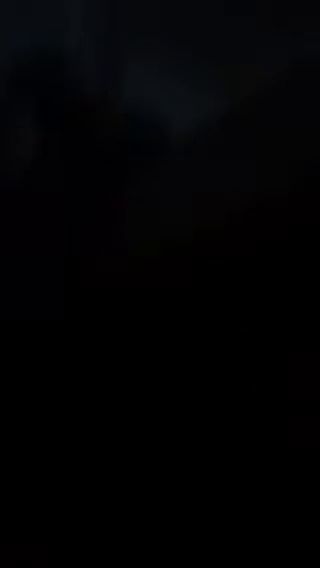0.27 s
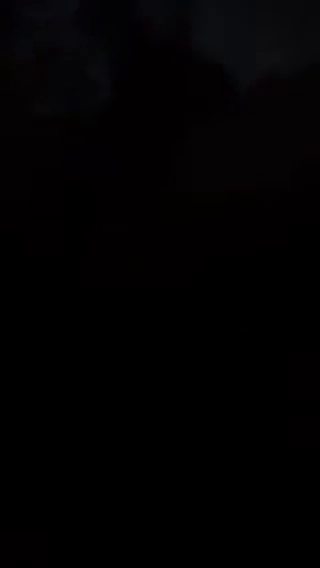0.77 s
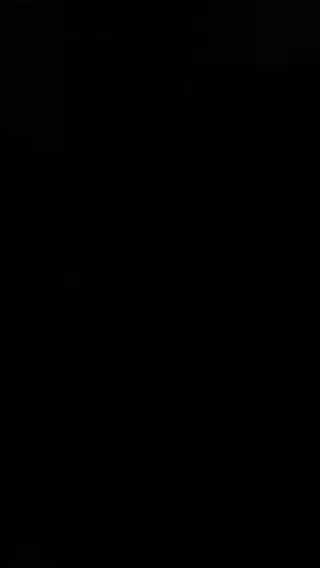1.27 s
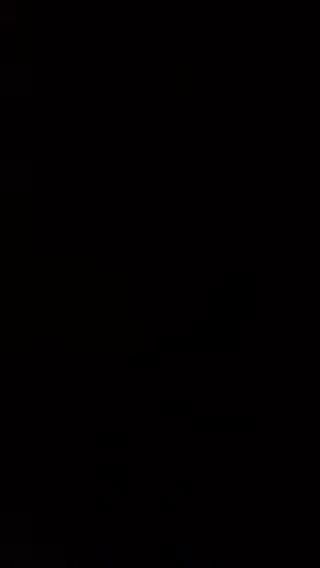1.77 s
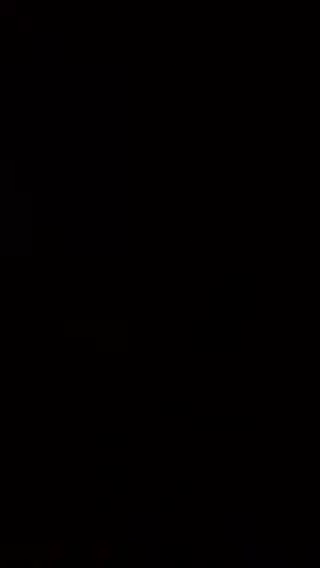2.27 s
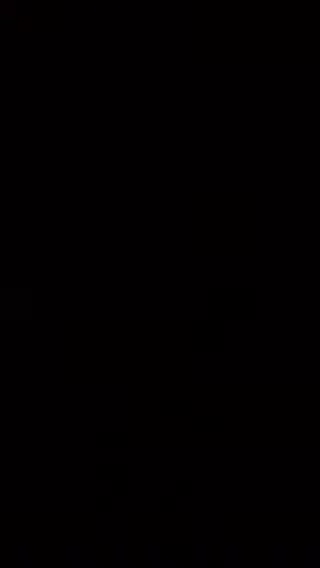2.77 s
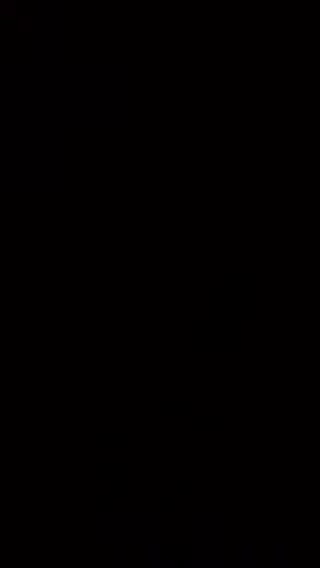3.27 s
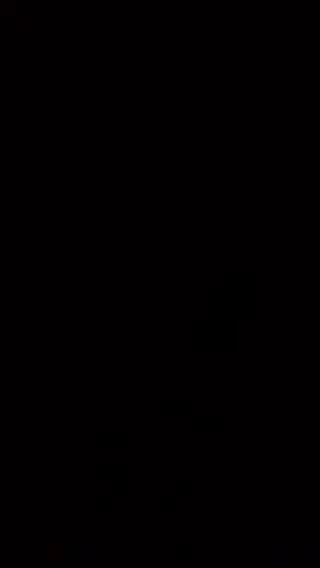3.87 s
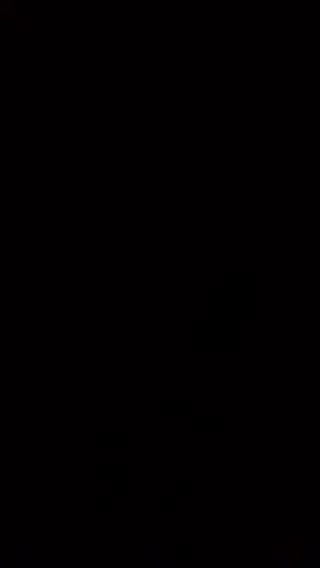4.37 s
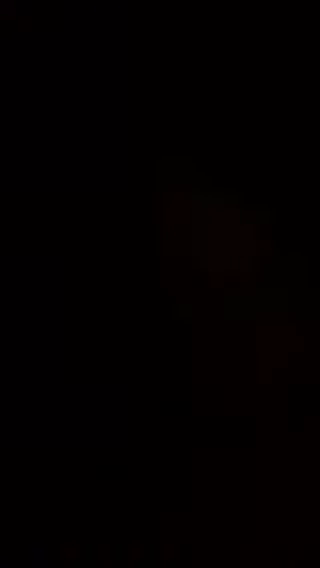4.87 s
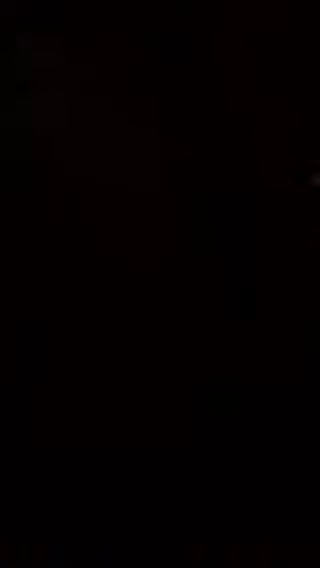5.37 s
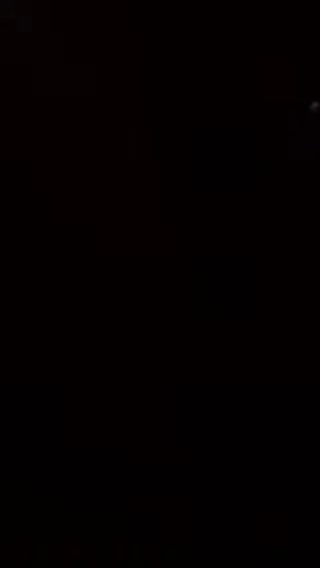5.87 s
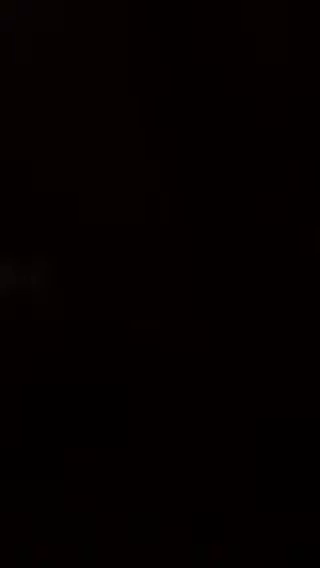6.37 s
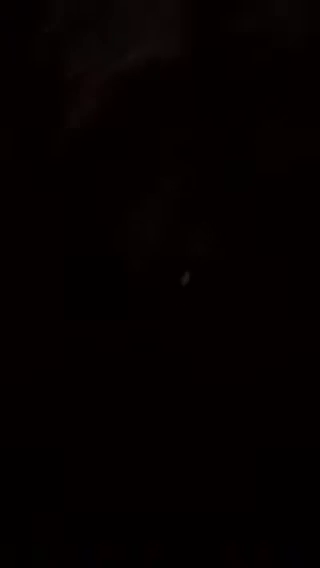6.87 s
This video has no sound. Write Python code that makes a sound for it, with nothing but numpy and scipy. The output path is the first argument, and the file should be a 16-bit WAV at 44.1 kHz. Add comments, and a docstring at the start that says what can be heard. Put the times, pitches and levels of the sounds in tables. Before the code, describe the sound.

Close up in a small quiet room, a small dog shuffles on soft bedding. A claw clicks and rasps at once, then a scrape at 0.35 s and light padded steps up to 0.9 s. A tight burst of snags and a scratch comes around 1.1 s, single clicks near 1.5 s. At 1.9-2.1 s paws and body land in a rolling cluster of deep, dull thumps. Clicks and softer steps continue, with small scrapes around 3 s. At 3.6 s a hard step thuds and knocks hollowly on the base beneath. From 4.2 to 5.5 s claws scratch more brightly, with a breathy fur swish near 5.4 s. Sparser clicks follow, a soft thump at 6.26 s, and a last click and step at 7.1 s. Bedding crinkles throughout; a faint wavering low hum and rumble grow stronger after 4.5 s and ease near 6.7 s.

```python
"""A claw snags with a sharp click and rasps over cloth: a puppy shuffles on soft bedding, close to the microphone.
The place is a small quiet room. Claws are bursts of tiny slips ringing through cloth resonances; paws and body
land as sagging low tones with a dull puff, and a hard step knocks on the firm base under the padding.
Fur swishes and creasing bedding are shaped noise and patches of small snaps.
Underneath lie a faint wavering mains hum, a low rumble and the noise of the room."""
import sys
import numpy as np
from scipy import signal
from scipy.fft import rfft, irfft, next_fast_len
from scipy.io import wavfile

SR = 44100
rng = np.random.default_rng(int(sys.argv[2]) if len(sys.argv) > 2 else 0)


def materialize(psi):
    """Save the field psi as 16-bit PCM at rate SR to the path in sys.argv[1].

    A 1-D psi becomes a single channel; in a 2-D psi each row is a channel.
    """
    bounded = np.clip(np.atleast_2d(psi).T, -1, 1)
    quanta = np.round(bounded * 32767).astype(np.int16)
    wavfile.write(sys.argv[1], SR, quanta)


N = 314124
TIME = np.arange(N) / SR  # seconds

# Event levels below are those before the trims of each layer.
# claws dragged over cloth: start_s, length_s, level_db (0.9-5 kHz), resonance_hz, treble_db (against the level)
CLAW_SCRAPES = [(0.026, 0.033, -43.5, 1360, -7), (0.348, 0.047, -34.5, 2180, -13.5),
                (0.825, 0.023, -42.5, 1370, -28), (0.86, 0.037, -48.5, 1400, -17),
                (1.067, 0.089, -38, 1880, -6), (1.255, 0.028, -42, 1790, -16),
                (1.634, 0.032, -46, 2530, -5.5), (1.836, 0.11, -40, 1940, -7.5),
                (2.067, 0.035, -46, 2600, -8.5), (2.413, 0.056, -48.5, 1520, -6.5),
                (2.597, 0.045, -46, 1800, -7), (2.938, 0.058, -43, 1680, -13),
                (3.006, 0.048, -39, 1640, -3), (3.098, 0.058, -50, 2460, 2.5),
                (3.157, 0.052, -47.5, 2650, -7), (3.34, 0.049, -44.5, 1290, -10),
                (3.642, 0.07, -44, 1440, -8), (3.705, 0.091, -46.5, 2100, -8),
                (4.197, 0.04, -37.5, 2880, -8.5), (4.48, 0.14, -39, 3140, -6),
                (4.742, 0.041, -46.5, 2240, -8.5), (4.81, 0.042, -33, 3520, -2.5),
                (5.079, 0.11, -38, 1450, -10), (5.169, 0.032, -47, 3050, -4),
                (5.255, 0.028, -48, 3020, 0.5), (5.39, 0.099, -47.5, 3170, -9),
                (5.482, 0.038, -34.5, 2500, -4.5), (5.828, 0.041, -39.5, 1560, -8.5),
                (6.157, 0.029, -48, 1460, -6), (6.29, 0.033, -46.5, 3300, -12),
                (6.864, 0.027, -48, 3830, 0.5)]
# claws snagging a thread: start_s, level_db (0.9-5 kHz), resonance_hz, treble_db (against the level)
CLAW_SNAGS = [(0.006, -32, 2340, -3.5), (0.63, -45.5, 1710, -9), (0.7131, -32.5, 4130, 0),
              (0.8444, -37, 1580, -8), (0.927, -48, 1740, -17), (1.059, -31, 2300, -23),
              (1.065, -32, 3260, -27), (1.0904, -29, 1730, -1), (1.108, -39, 5000, 0),
              (1.4723, -31.5, 1370, -11.5), (1.478, -36.5, 3570, -2.5), (1.7267, -39.5, 3520, -8.5),
              (1.751, -42, 1870, -12), (1.8405, -28.5, 1540, -24), (1.8817, -44, 2400, 10),
              (1.915, -42, 1950, 2), (1.9462, -48.5, 2370, 18.5), (2.2572, -33.5, 3350, 1.5),
              (2.309, -32.5, 1500, -20), (2.5803, -42, 4170, -6), (2.6876, -32, 2160, -18.5),
              (3.1763, -38.5, 2650, -4), (3.434, -29, 4100, -9.5), (3.6408, -34.5, 2140, -12.5),
              (4.1151, -34, 4480, -9), (4.2032, -38, 2630, -7), (4.4803, -37, 1940, -43),
              (4.554, -33.5, 3930, -4), (4.591, -39.5, 4350, 4), (4.8145, -31, 3280, -10),
              (4.959, -35, 1790, -12), (5.1782, -28.5, 3080, -16), (5.4833, -30, 2540, -13),
              (5.4915, -51, 2410, -8), (5.6223, -47.5, 2320, -7), (5.7304, -45, 2440, -11),
              (5.8293, -39.5, 2380, -15), (5.938, -36, 2480, -4.5), (6.262, -37.5, 1870, -13),
              (6.34, -38, 4320, -10.5), (6.654, -41, 4000, -3), (7.110, -33.5, 1540, -10)]
# paws and body landing on the padding: start_s, peak_db, pitch_hz
THUMPS = [(0.213, -40, 120), (0.471, -35.5, 164), (.675, -47, 199), (0.832, -36.5, 196), (0.903, -34, 75.6),
          (.91, -41, 293), (1.063, -38.5, 197), (1.897, -34.5, 148), (1.915, -31, 52.7),
          (1.941, -27.5, 120), (1.964, -24.5, 212), (2.009, -31, 89.5), (2.039, -32, 192),
          (2.08, -34.5, 91), (2.633, -34, 175), (2.679, -38.5, 151), (2.762, -39.5, 214),
          (2.826, -37.5, 96), (3.351, -42, 68), (3.497, -38.5, 106), (3.595, -23.5, 251), (3.612, -26, 216),
          (3.644, -25.5, 227), (3.643, -35, 64.6), (3.681, -33.5, 166), (4.249, -42.5, 170),
          (4.471, -40, 187), (4.53, -37, 200), (5.121, -45, 60), (5.564, -37, 174.6), (6.026, -37.5, 175),
          (6.263, -31, 166), (6.385, -38.5, 69), (6.466, -38, 246), (7.109, -36.5, 238)]
# hollow knocks from the firm base under the padding: start_s, peak_db, pitch_hz
BASE_KNOCKS = [(.349, -39, 600), (2.307, -46, 650), (3.345, -43, 644), (3.597, -30, 589), (3.598, -30, 342),
               (3.597, -31.5, 1155), (3.65, -32.5, 1182), (4.535, -42.5, 654), (5.384, -45, 438),
               (6.26, -43.5, 583), (6.468, -45.5, 348), (7.109, -41.5, 605)]
# fur sliding over cloth: start_s, rise_s, length_s, level_db
FUR_SWISHES = [(0.218, 0.23, 0.34, -54.5), (1.568, 0.011, 0.059, -49), (3.34, 0.033, 0.036, -48),
               (4.855, 0.018, 0.048, -43), (5.324, 0.018, 0.16, -45.5), (5.362, 0.042, 0.094, -35),
               (6.447, 0.031, 0.049, -44.5)]
# the dog shifts its weight and the bedding creases: start_s, length_s, crinkle_level_db, fur_hiss_level_db
WEIGHT_SHIFTS = [(0.179, 0.42, -49.5, -62), (0.75, 0.26, -53, -74), (1.187, 0.23, -52, -56),
                 (1.544, 0.16, -48, -64), (1.93, 0.14, -72, -65), (2.149, 0.43, -53, -64.5),
                 (2.596, 0.27, -51.5, -63), (3.27, 0.4, -50, -59.5), (3.75, 0.2, -56, -74),
                 (4.02, 0.24, -54, -71), (4.235, 0.33, -51, -72), (4.83, 0.26, -49.5, -52),
                 (5.555, 0.18, -65, -88), (5.84, 0.26, -63, -63.5), (6.07, 0.54, -56, -65),
                 (6.55, 0.39, -78, -67), (7.009, 0.063, -60, -69.5)]
# hum and the low rumble that swells with it: time_s, level_db
HUM_LEVEL = [(0, -56), (2.6, -56), (4.05, -61), (4.6, -49.5), (5.5, -52.5), (6.5, -47.5), (6.75, -56.5)]

# Spectra, each with columns frequency_hz, density_db (per Hz, relative).
# stretched cloth under a claw, before its resonances
CLOTH_SPECTRUM = [(100, -18), (300, -10), (600, -11.5), (850, -8.5), (1080, -3.5), (1300, -0.5),
                  (2200, 2.5), (3500, -1), (6000, -10), (9000, -18), (12000, -22), (15500, -31.5)]
# puff pressed out of the padding
PADDING_SPECTRUM = [(20, 0), (50, -3), (130, 4), (250, -0.5), (380, -11.5), (620, -18), (800, -19),
                    (1150, -16.5), (2000, -24), (6000, -40)]
# hairs in a swish
FUR_SPECTRUM = [(200, 0), (450, -9), (850, -19), (1700, 2), (4000, 1), (7000, 3.5), (11000, 5.5),
                (15500, 4)]
# slow brushing of fur during a shift of weight
NAP_SPECTRUM = [(300, -24), (1000, -2), (2000, -12), (5000, 8), (7500, 6), (11000, 0.5), (15500, -0.5)]
# low rumble under the hum
RUMBLE_SPECTRUM = [(20, -40), (40, -14), (58, 9), (85, 5.5), (130, 2.5), (200, 3), (300, -27.5), (500, -43),
                   (1500, -24)]
# noise of the room
AIR_SPECTRUM = [(20, -23), (35, -2), (55, -10.5), (80, -2.5), (130, 0), (220, -4), (330, -12), (500, -12),
                (1000, -15.5), (2200, -23.5), (5000, -25.5), (10000, -35), (15500, -36)]
# decay of the room: frequency_hz, t60_s
ROOM_DECAY = [(100, 0.79), (500, 0.4), (2000, 0.22), (6000, 0.19), (14000, 0.14)]

HUM_HZ = 118
EDGE_HZ = 15600  # upper limit of the band
RISE_SHARE = 0.39  # part of a drag spent building up pressure
RING_DB, BLUR_DB_PER_S = 9.5, 42  # height of the resonance; a longer drag crosses more spots and blurs it
SLIDE_S, SLIDE_RISE_S, SLIDE_DB = 0.016, 0.001, -9  # short slide after every snag, against the snag's level
SWELL_S, SWELL_HZ, SWELL_SLOPE = 0.0083, 178, 0.38  # swell time at this pitch; deeper thumps swell more slowly
KNOCK_CYCLES = 3.1  # the envelope of a knock peaks after this many cycles
SHIFT_TAPER = 0.34  # part of a shift spent swelling and fading
CREASE_DB, SETTLE_DB_PER_S = -13, 89  # creasing against the drag's level; the creases then settle
SNAG_CREASE_DB, CREASE_HISS_DB = -15, -19.5  # creasing against the snag's level; fur hiss against crinkle


def scrapes(level_db=-2.0, dull_db=-5, bright_db=0.0, clump_db=1.5, stutter_db=2.0):
    """A claw catches abruptly, then rasps over the weave in clumps of tiny slips, brightening as it speeds up."""
    grip = amp(clump_db * drift(300) + stutter_db * drift(80))
    slips = np.tile(grains(per_s=4200, spread_db=1.5) * grip, 2)
    out = np.zeros(N + SR)
    for start_s, rise_s, length_s, db, hz, treble_db in drags():
        height_db = RING_DB - BLUR_DB_PER_S * length_s
        press = stroke(rise_s, length_s, start=0.51, end=0.33)
        own_slips = slips[max(int(start_s * SR), 0):][:len(press)]
        run = amp(db + level_db) * evened(press * own_slips)
        speed = np.minimum(np.arange(len(run)) / SR / max(rise_s, .001), 1)
        # crossfade from a dull ring to a bright one
        for share, extra_db in (1 - speed, dull_db), (speed, bright_db):
            ring = cloth(hz, treble_db + extra_db, peak_db=height_db, octaves=0.17, uneven_db=3.25)
            add(out, start_s, signal.fftconvolve(run * share, ring))
    return out[:N]


def drags():
    """Every drag, and the slide after every snag: start_s, rise_s, length_s, level_db, resonance_hz, treble_db."""
    full = [(start_s, RISE_SHARE * length_s, length_s, db, hz, treble_db)
            for start_s, length_s, db, hz, treble_db in CLAW_SCRAPES]
    slides = [(start_s, SLIDE_RISE_S, SLIDE_S, db + SLIDE_DB, hz, treble_db)
              for start_s, db, hz, treble_db in CLAW_SNAGS]
    return full + slides


def clicks(level_db=-1.0, crackle=1.75, fade_s=0.0033, count=600):
    """A thread snaps off the claw, and a few milliseconds of smaller slips follow."""
    out, t = np.zeros(N), np.arange(count) / SR
    slips = grains(per_s=5700, spread_db=3.0)
    for k, (start_s, db, hz, treble_db) in enumerate(CLAW_SNAGS):
        after = slips[k * count:][:count] * np.exp(-t / fade_s)
        snap = crackle * after / (np.linalg.norm(after) + 1e-9) + (t == 0)
        snap *= np.sqrt(.004 * SR) / np.linalg.norm(snap)  # the energy of 4 ms at rms 1
        ring = cloth(hz, treble_db, peak_db=7.0, octaves=0.12, uneven_db=1.5)
        add(out, start_s, amp(db + level_db) * signal.fftconvolve(snap, ring))
    return out[:N]


def cloth(hz, treble_db, peak_db, octaves, uneven_db, size=2048):
    """Ring of one spot of stretched cloth: a main resonance, uneven lesser ones and a treble shelf."""
    f = np.fft.rfftfreq(size, 1 / SR)
    body, top = (f > 900) & (f < 5000), (f > 5000) & (f < EDGE_HZ)
    knots = np.linspace(np.log(200), np.log(SR / 2), 60)
    lesser = np.interp(np.log(f + 1), knots, rng.standard_normal(60))
    resonance_db = peak_db / (1 + (np.log2((f + 1) / hz) / octaves) ** 2)
    db = read(CLOTH_SPECTRUM, f) + resonance_db + uneven_db * lesser
    top_to_body = np.sum(amp(db[top]) ** 2) / np.sum(amp(db[body]) ** 2)
    lack_db = treble_db - 10 * np.log10(top_to_body)
    db = db + lack_db * np.interp(f, [3300, 5800], [0, 1])
    # the level counts in the body band only
    log_gain = np.log(amp(db) / np.sqrt(2 * np.sum(amp(db[body]) ** 2) / size))
    circle = np.concatenate([log_gain, log_gain[-2:0:-1]])
    # minimum phase: causal, with a sharp start and a short ring
    return np.fft.ifft(np.exp(np.conj(signal.hilbert(circle)))).real


def grains(per_s, spread_db):
    """Fibres letting go at random: many small impulses and a few large ones."""
    size = amp(spread_db * np.minimum(rng.exponential(1, N), 4))
    return size * rng.choice([-1, 1], N) * (rng.random(N) < per_s / SR)


def stroke(rise_s, length_s, start, end):
    """Pressure of a stroke: from a share start up to full, then down to a share end, evened to rms 1."""
    t = np.arange(int(max(length_s, .005) * SR)) / SR
    peak_s = np.clip(rise_s, .001, t[-1] - .001)
    return evened(np.exp(np.interp(t, [0, peak_s, t[-1]], np.log([start, 1, end]))))


def thumps(push_db=-1, puff_db=-10.5, sag=0.067, wobble=0.095):
    """Each landing rocks the padding for a few uneven cycles and presses a dull puff out of it."""
    out, weight, t = np.zeros(N), np.zeros(N), np.arange(SR // 4) / SR
    stiffness = np.tile(np.exp(wobble * drift(180)), 2)  # the stuffing gives way in fits
    for start_s, db, hz in THUMPS:
        u = t / (SWELL_S * (SWELL_HZ / hz) ** SWELL_SLOPE)  # time in swell times
        push = amp(db) * u * np.exp(1 - u)
        sagging = 1 + sag * (np.exp(1 - u) - 1)  # the pitch sags as the padding relaxes
        pitch_hz = hz * sagging * stiffness[int(start_s * SR):][:len(t)]
        add(out, start_s, push * np.sin(2 * np.pi * np.cumsum(pitch_hz) / SR))
        add(weight, start_s, push)
    puff = weight * shaped(rng.standard_normal(N), PADDING_SPECTRUM)
    return amp(push_db) * out + amp(puff_db) * puff


def knocks(level_db=0, spread=0.205):
    """A hard step reaches the base, which answers with five close, heavily damped modes."""
    out, t = np.zeros(N), np.arange(SR // 8) / SR
    ratios = np.linspace(-1, 1, 5)[:, None]
    for start_s, db, hz in BASE_KNOCKS:
        swell_s = KNOCK_CYCLES / hz
        mode_hz = hz * (1 + spread * ratios * rng.uniform(0.67, 1, (5, 1)))
        modes = np.sin(2 * np.pi * (mode_hz * t + rng.random((5, 1)))).mean(0)
        envelope = t / swell_s * np.exp(1 - t / swell_s)
        add(out, start_s, amp(db + level_db) * evened(modes) * envelope / 2)
    return out


def swishes():
    """Thousands of hairs slide over the cloth: a smooth bright hiss, made of shaped noise."""
    level = np.zeros(N)
    for start_s, rise_s, length_s, db in FUR_SWISHES:
        press = stroke(rise_s, length_s, start=0.25, end=0.067)
        add(level, start_s, amp(db) * press * signal.windows.tukey(len(press), .15))
    return level * shaped(rng.standard_normal(N), FUR_SPECTRUM)


def rustle(heavy_db=-9, crinkle_db=-2.5, hiss_db=0, flutter_db=2.76, count=12):
    """Small patches of bedding, each with its own colour, crease under claws and shifting weight; fur brushes."""
    crinkle, hiss = stirring()
    fine = evened(grains(per_s=3000, spread_db=3.0))
    heavy = evened(grains(per_s=78, spread_db=3.0))
    snaps = fine + amp(heavy_db) * heavy  # sparser, heavier snaps crackle among the fine ones
    patch = rng.integers(0, count, N)  # which patch each snap belongs to
    creases = np.zeros(N)
    for k, hz in enumerate(np.geomspace(1400, 3600, count)):
        ring = cloth(hz, -7, peak_db=5, octaves=.25, uneven_db=2)
        patch_snaps = snaps * (patch == k) * amp(4.8 * drift(30))
        creases += signal.oaconvolve(patch_snaps, ring)[:N]
    crinkles = crinkle * amp(crinkle_db) * evened(creases)
    # slow brushing is duller than a swish
    fur = hiss * amp(hiss_db) * shaped(rng.standard_normal(N), NAP_SPECTRUM)
    return (crinkles + fur) * amp(flutter_db * drift(30))


def stirring():
    """Strength of crinkle and of fur hiss: a swell for each shift of weight, a dying trail after each claw."""
    crinkle = np.zeros(N)  # powers, until the roots at the end
    for start_s, length_s, db, _, _ in CLAW_SCRAPES:
        crinkle += settling(start_s + RISE_SHARE * length_s, db + CREASE_DB)
    for start_s, db, _, _ in CLAW_SNAGS:
        crinkle += settling(start_s, db + SNAG_CREASE_DB)
    hiss = crinkle * amp(CREASE_HISS_DB) ** 2
    for start_s, length_s, crinkle_db, hiss_db in WEIGHT_SHIFTS:
        swell = signal.windows.tukey(int(length_s * SR), SHIFT_TAPER)
        add(crinkle, start_s, (amp(crinkle_db) * swell) ** 2)
        add(hiss, start_s, (amp(hiss_db) * swell) ** 2)
    return np.sqrt(crinkle), np.sqrt(hiss)


def settling(start_s, db):
    """Power of the creasing that a contact starts and that dies away steadily."""
    power, t = np.zeros(N), np.arange(SR // 2) / SR
    add(power, start_s, amp(db - SETTLE_DB_PER_S * t) ** 2)
    return power


def background(air_db=-56, rumble_db=-5, hum_db=-2.5, upper_db=-13, lower_db=-8, waver_db=2.5, wander=0.24):
    """A wavering hum, a weak tone above, one an octave below and a low rumble, over the noise of the room."""
    level = amp(np.interp(TIME, *np.transpose(HUM_LEVEL)))
    main = np.sin(2 * np.pi * HUM_HZ * TIME + wander * drift(12.0))
    upper = np.sin(2 * np.pi * 229 * TIME + drift(11))
    lower = np.sin(np.pi * HUM_HZ * TIME + 0.33 * drift(3.67))
    tones = main + amp(upper_db) * upper + amp(lower_db) * lower
    hum = np.sqrt(2) * amp(hum_db + waver_db * drift(14)) * tones
    rumble = amp(rumble_db + 6.2 * drift(6.3)) * shaped(rng.standard_normal(N), RUMBLE_SPECTRUM)
    air = amp(air_db) * shaped(rng.standard_normal(N), AIR_SPECTRUM)
    return level * (hum + rumble) + air


def room(x, wet_db, early_db, early_s=0.0053, count=3):
    """Close surfaces return clustered echoes and a short soft tail; the pattern drifts steadily between three."""
    t, out = np.arange(SR // 2) / SR, x
    for k in range(count):
        taps = rng.choice([-1., 1.], len(t)) * (rng.random(len(t)) < 5000 / SR) * (t > .0015)
        hz, frame_s, z = signal.stft(taps, SR, nperseg=256)
        decay = amp(-60 * frame_s / read(ROOM_DECAY, hz)[:, None])
        tail = signal.istft(z * decay, SR, nperseg=256)[1][:len(t)]
        early = taps[::-1] * (t > .0015) * np.exp(-t / early_s)
        echo = amp(wet_db) * tail / np.linalg.norm(tail) + amp(early_db) * early / np.linalg.norm(early)
        # each pattern's share of the sound; the squares sum to 1
        share = np.sqrt(2 / count) * np.cos(np.pi * (TIME + k / count))
        out = out + signal.oaconvolve(x * share, echo)[:N]
    return out


def amp(db):
    """Decibels to gain."""
    return 10 ** (np.asarray(db) / 20)


def evened(x):
    """Scales to rms 1."""
    return x / np.sqrt(np.mean(x ** 2) + 1e-20)


def read(points, hz):
    """A table's value on a log-frequency axis."""
    f, value = np.transpose(points)
    return np.interp(np.log(hz + 1), np.log(f), value)


def add(mix, start_s, sound):
    """Mixes a sound in at its start time, cut at the end of the mix."""
    part = mix[max(round(start_s * SR), 0):][:len(sound)]
    part += sound[:len(part)]


def shaped(x, spectrum):
    """Gives a long signal a spectrum, at rms 1."""
    size = next_fast_len(N)
    gain = amp(read(spectrum, np.fft.rfftfreq(size, 1 / SR)))
    return evened(irfft(rfft(x, size) * gain, size)[:N])


def drift(hz):
    """Random wander: straight lines between normal random values drawn hz times a second."""
    return np.interp(TIME * hz, np.arange(4000), rng.standard_normal(4000))


def scene():
    """The dog on its bedding in the room; the padding keeps the thumps nearly dry."""
    claws = room(scrapes() + clicks() + knocks(), wet_db=-8, early_db=-9.5)
    body = room(thumps(), wet_db=-17, early_db=-16)
    fur = room(swishes(), wet_db=-20, early_db=-20.5)
    return (claws + body + fur + rustle() + background())[None]


def record(dry):
    """The recorder's band limit: a steep low-pass behind the microphone."""
    low_pass = signal.firwin(511, EDGE_HZ, window=("kaiser", 9), fs=SR)
    return signal.oaconvolve(dry, low_pass[None], "same")


dry = scene()
out = record(dry)
materialize(out)
```